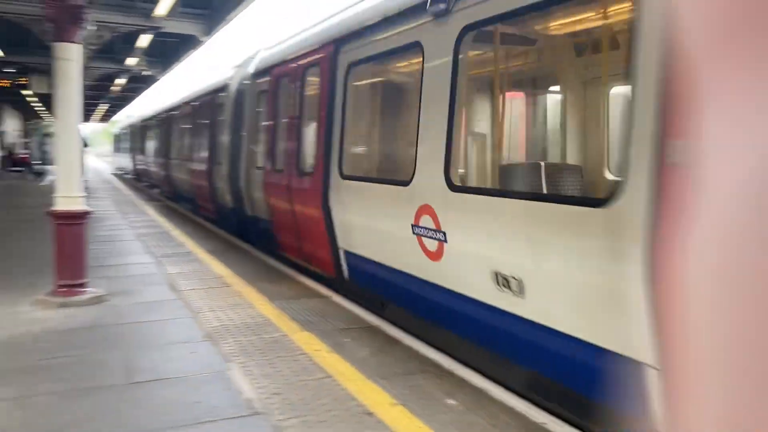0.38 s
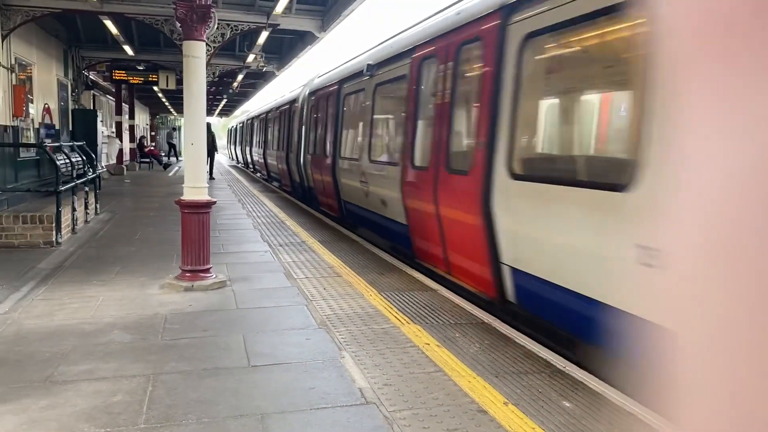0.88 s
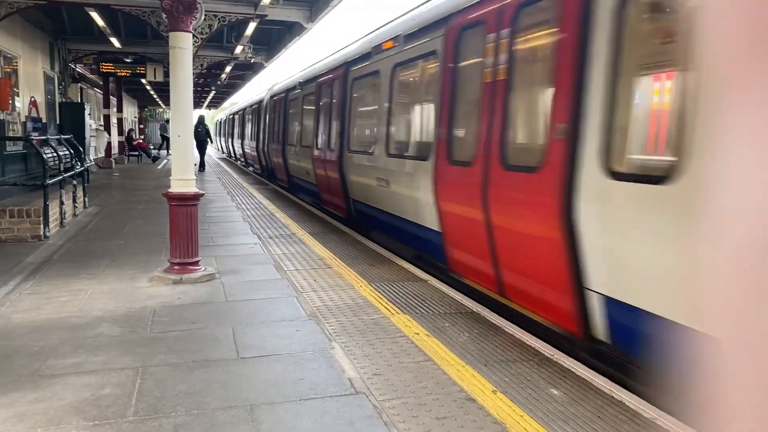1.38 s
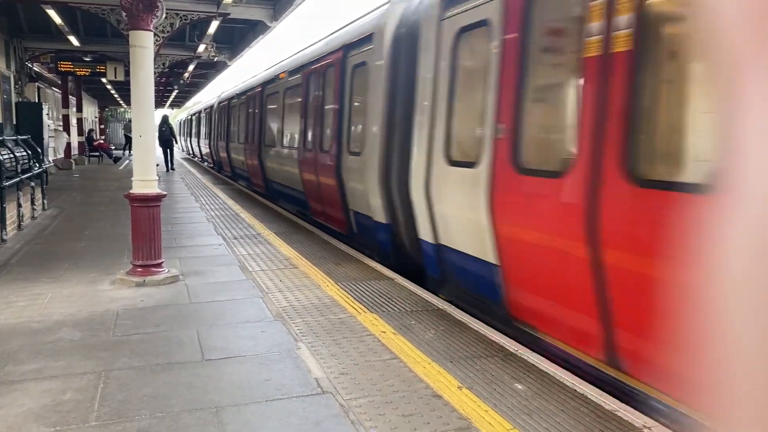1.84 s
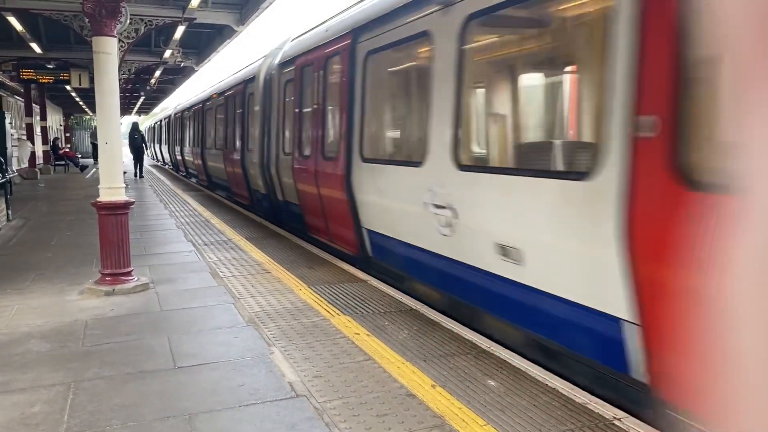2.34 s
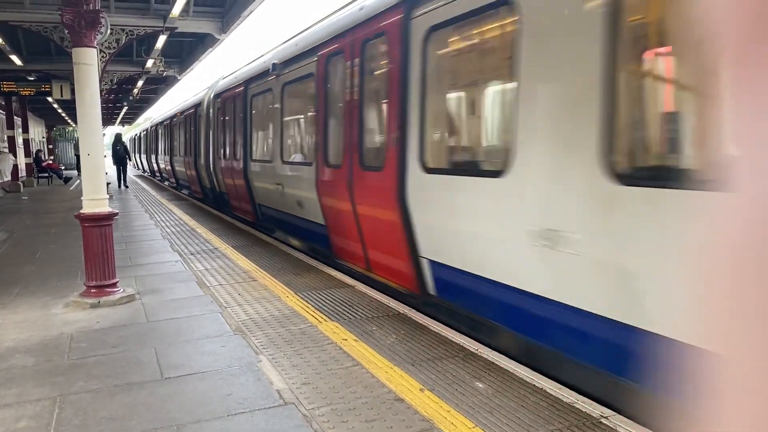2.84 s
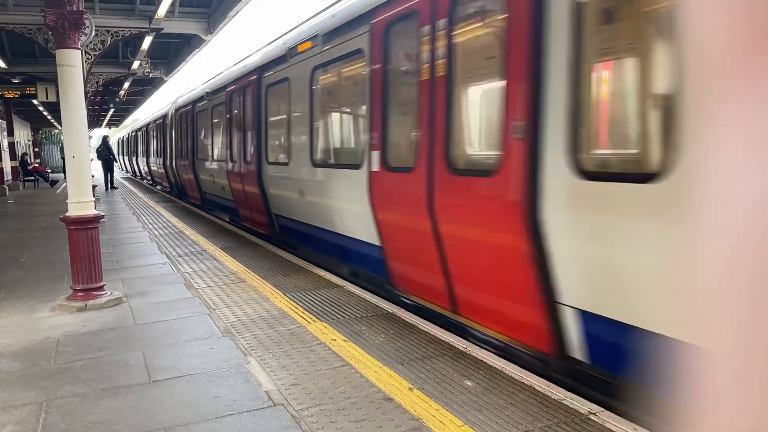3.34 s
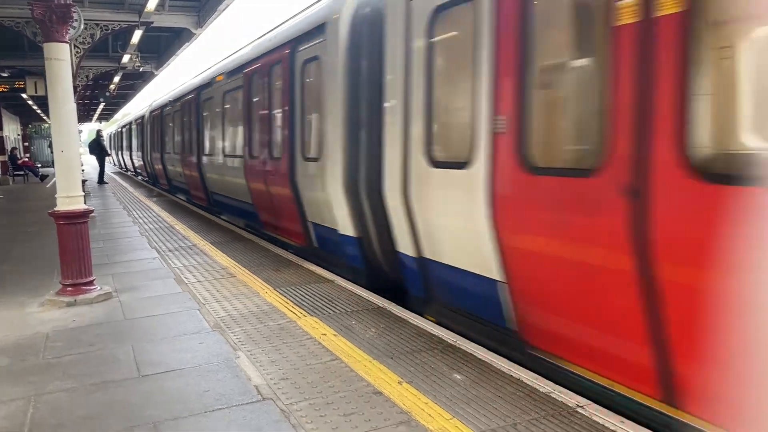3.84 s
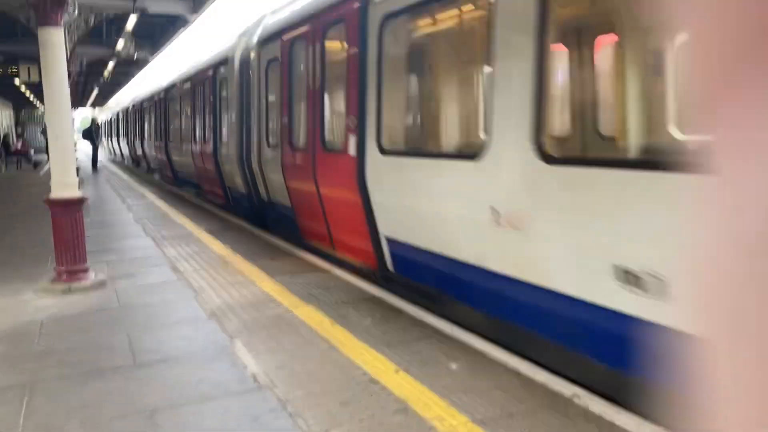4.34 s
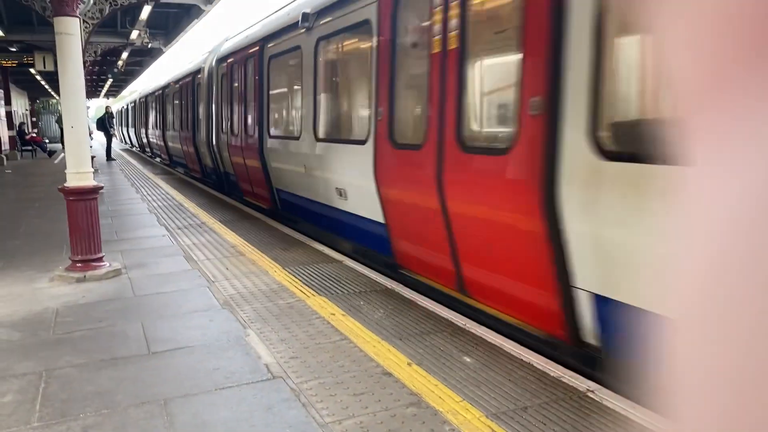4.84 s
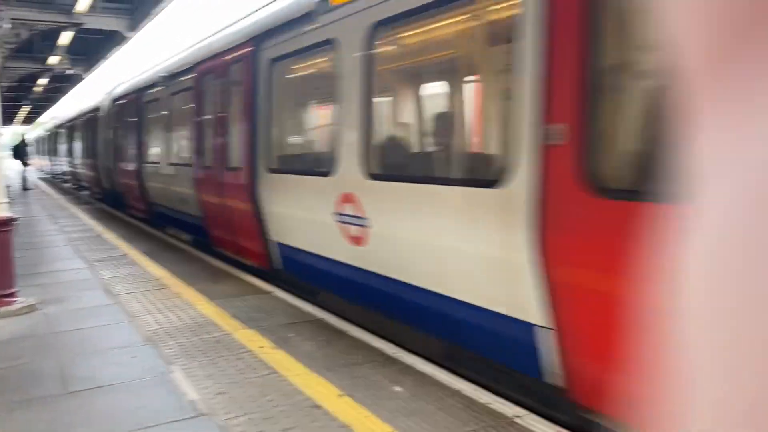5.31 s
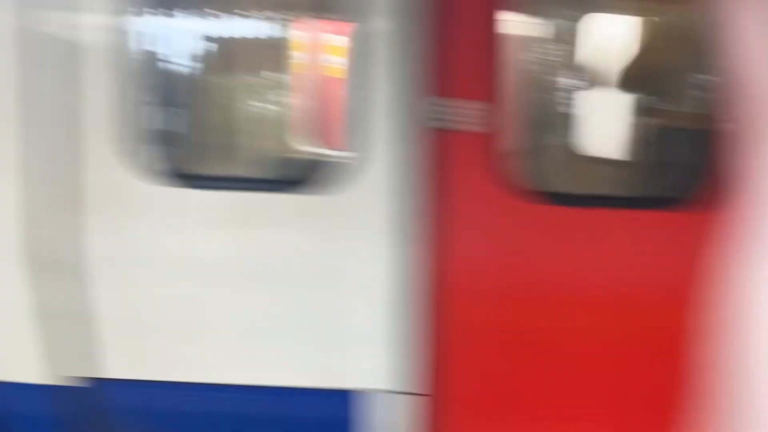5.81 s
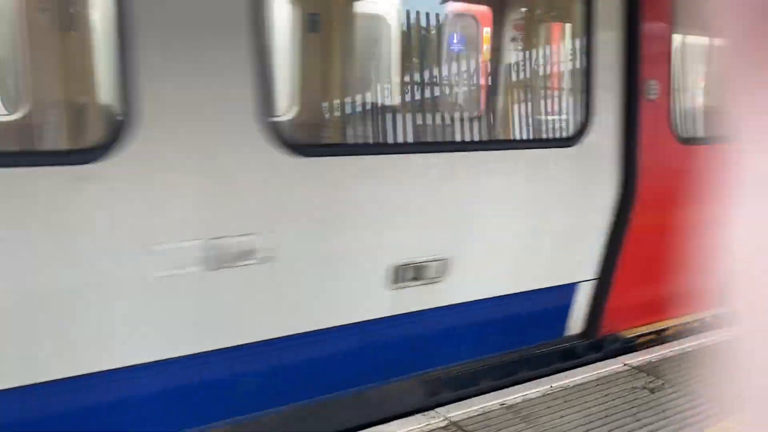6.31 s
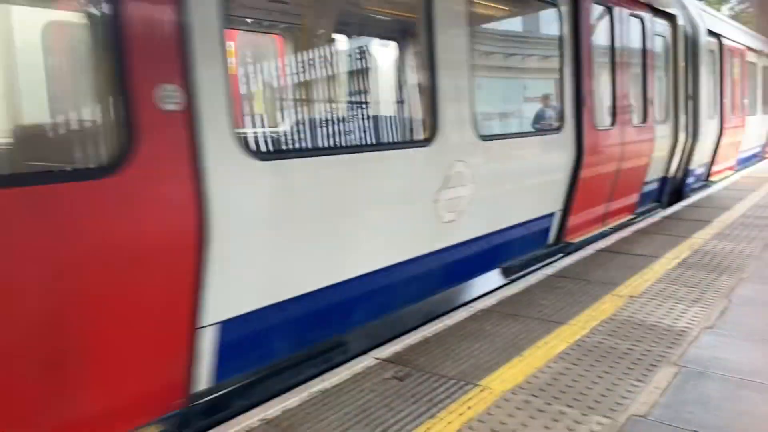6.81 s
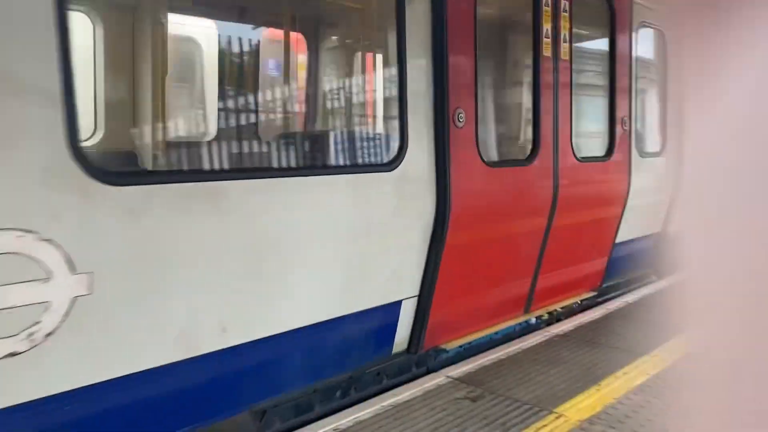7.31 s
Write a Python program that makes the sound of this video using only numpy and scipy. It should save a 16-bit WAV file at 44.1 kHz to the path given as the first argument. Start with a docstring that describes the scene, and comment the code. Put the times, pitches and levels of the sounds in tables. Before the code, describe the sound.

Low wheel rumble and rail roar slowly ease as a train slows close by, its whine sinking while brake scrape and hiss grow.

```python
"""Electric train braking under a station roof

A train slows along a platform, close to a phone with two microphone ports. Filtered noise makes wheel
rumble, roar and ringing rails; wavering sines make gear whine that glides down with the speed.
A broken inverter tone gives way to stronger noisy bands. Loose bogie steel knocks as short decaying modes.
Brake scrape and air hiss grow towards the end, with an air leak and rough squealing bands.
"""
import sys
import numpy as np
from scipy import signal
from scipy.fft import rfft, irfft, next_fast_len
from scipy.io import wavfile
from scipy.ndimage import uniform_filter1d, map_coordinates

SR = 44100
rng = np.random.default_rng(int(sys.argv[2]) if len(sys.argv) > 2 else 0)


def volts_from_db(level):
    """Convert decibel levels to linear amplitude ratios."""
    exponent = np.asarray(level, float) / 20
    return 10 ** exponent


def generate_wav(signal):
    """Clip the signal to [-1, 1] and save it as 16-bit WAV at the path in sys.argv[1]."""
    frames = np.transpose(np.atleast_2d(signal))
    scaled = np.clip(frames, -1, 1) * 32767
    pcm = np.round(scaled).astype(np.int16)
    wavfile.write(sys.argv[1], SR, pcm)


N = 338438  # samples


def clock():
    """Time of every sample in seconds."""
    return np.arange(N) / SR


def unit(x):
    """Scale to rms 1."""
    return x / np.sqrt(np.mean(x ** 2) + 1e-20)


def along(points, hz):
    """Interpolate the value columns of (Hz, value, ..) points on a log frequency axis."""
    point_hz, *columns = np.transpose(points)
    return np.array([np.interp(np.log(hz + 1), np.log(point_hz + 1), column) for column in columns])


def wobble(rate):
    """A smooth random curve, rate knots a second."""
    knots = rng.standard_normal(int(N * rate / SR) + 4)
    return map_coordinates(knots, [np.arange(N) * rate / SR])


def step(at_s, spread_s):
    """A smooth rise from 0 to 1, halfway at at_s."""
    return 1 / (1 + np.exp((at_s - clock()) / spread_s))


def swells(rows, floor_db):
    """Level in dB of bell-shaped swells (s, half length s, peak dB) whose power adds to a floor."""
    power = sum(volts_from_db(2 * db) * np.exp(-((clock() - s) / half_s) ** 2) for s, half_s, db in rows)
    return 10 * np.log10(power + volts_from_db(2 * floor_db))


def filtered(x, response):
    """Multiply the spectrum of x by a response of frequency."""
    size = next_fast_len(N + SR // 2)
    return irfft(rfft(x, size) * response(np.fft.rfftfreq(size, 1 / SR)), size)[..., :N]


def band(f, hz, width_hz):
    """A resonance applied twice; width_hz is that of one pass."""
    return (f * width_hz / (hz * hz - f * f + 1j * f * width_hz)) ** 2


def rush(response, patchy_db):
    """Two unrelated noises of joint rms 1 with shared time-frequency patches of random gain."""
    z = signal.stft(rng.standard_normal((2, N + 512)), nperseg=512)[2]
    patches = uniform_filter1d(rng.standard_normal(z.shape[1:]), size=6, axis=0)
    patches = unit(uniform_filter1d(patches, size=12, axis=1))
    pair = signal.istft(z * volts_from_db(patchy_db * patches), nperseg=512)[1][:, :N]
    return unit(filtered(pair, response))


def coloured(spectrum, patchy_db):
    """Patchy noise shaped by a (Hz, dB) spectrum."""
    return rush(lambda f: volts_from_db(along(spectrum, f)), patchy_db)


def tone(hz, db, waver_hz, flutter_db):
    """A sine whose pitch and level waver, as from several motors beating."""
    phase = 2 * np.pi * np.cumsum(hz + waver_hz * wobble(40)) / SR
    level_db = db + flutter_db * (.4 * wobble(9) + wobble(35))
    return np.sqrt(2) * volts_from_db(level_db) * np.sin(phase)


def strand(hz, width_hz):
    """A narrow noise of rms 1 that follows a moving pitch; width_hz is the rate of its wobbles."""
    phase = 2 * np.pi * np.cumsum(hz + np.zeros(N)) / SR
    return unit(wobble(width_hz) * np.sin(phase) + wobble(width_hz) * np.cos(phase))


MESH_HZ = 565  # gear mesh at the start
SAG_HZ_PER_S, SAG_HZ_PER_S2 = 24.6, .87  # braking bites ever harder


def mesh():
    """Gear mesh pitch in Hz, a measure of the speed."""
    return MESH_HZ - SAG_HZ_PER_S * clock() - SAG_HZ_PER_S2 * clock() ** 2


# Spectrum of the ground thud. Each row: frequency in Hz, relative density in dB per Hz.
THUD_SPECTRUM = [(22, -42), (32, -9), (42, -6.5), (55, 7.5), (66, 5.5), (76, 11), (86, 7), (100, -6),
                 (130, -27), (200, -64)]
# Spectrum of the bogie rumble. Each row: frequency in Hz, relative density in dB per Hz.
RUMBLE_SPECTRUM = [(60, -54), (90, -3), (120, -0.5), (168, -3), (229, -2), (300, -3), (421, -5.5),
                   (531, -12.5), (601, -11.5), (747, -21), (1000, -32.5), (2000, -90)]
# Spectrum of the tread roar. Each row: frequency in Hz, relative density in dB per Hz.
ROAR_SPECTRUM = [(400, -29), (700, 1), (1000, 0), (1600, -3), (1800, -2), (2400, -5.5), (3050, -3.5),
                 (3330, -9), (3600, -6.5), (4600, -9.5), (5500, -18), (7000, -24), (9000, -59)]
# The thud swells as axles pass. Each row: centre in seconds, peak level in dB.
AXLE_PASSES = [(.3, -22.5), (1.05, -28), (1.49, -24.5), (2.41, -23.5), (2.86, -27), (3.18, -21),
               (3.7, -23.5), (4.31, -21.5), (4.62, -26.5), (5.0, -33.5), (5.4, -23.5), (6.09, -24),
               (7.24, -27.5)]
# Ringing of car floor and rail. Each row: centre in Hz, width in Hz, rms level in dB at the starting speed.
RINGING_BANDS = [(232, 40, -29.5), (605, 50, -43)]
THUD_DB, RUMBLE_DB, ROAR_DB = -27, -20.5, -33.5  # at the starting speed
THUD_LAW, RUMBLE_LAW, ROAR_LAW, RING_LAW = 0.4, 0.72, 0.59, 0.59  # dB lost for each dB of speed lost
AXLE_HALF_S, AXLE_RUMBLE_DB = 0.083, -8  # half length of a swell; rumble it brings along, over the thud


def wheels():
    """Rough wheels on rough rail: the ground thuds, bogies rumble, treads roar and floor and rail ring."""
    speed_db = 20 * np.log10(mesh() / MESH_HZ)
    axles = volts_from_db(swells([(s, AXLE_HALF_S, db) for s, db in AXLE_PASSES], floor_db=-80))
    thud_gain = np.hypot(volts_from_db(THUD_DB + THUD_LAW * speed_db), axles)
    thud = thud_gain * coloured(THUD_SPECTRUM, patchy_db=-0.26)
    rumble_gain = np.hypot(volts_from_db(RUMBLE_DB + RUMBLE_LAW * speed_db), volts_from_db(AXLE_RUMBLE_DB) * axles)
    rumble = rumble_gain * volts_from_db(0.45 * wobble(5)) * coloured(RUMBLE_SPECTRUM, patchy_db=0.65)
    roar_gain = volts_from_db(ROAR_DB + ROAR_LAW * speed_db + 0.41 * wobble(7))
    roar = roar_gain * coloured(ROAR_SPECTRUM, patchy_db=1.44)
    rings = 0
    for hz, width_hz, db in RINGING_BANDS:
        ring_gain = volts_from_db(db + RING_LAW * speed_db + 1.3 * wobble(3))
        rings = rings + ring_gain * rush(lambda f: band(f, hz, width_hz), patchy_db=.5)
    return thud + rumble + roar + rings


# Each gear order swells while a motor bogie is near.
# Second order. Each row: centre in seconds, half length in seconds, peak level in dB before the mix.
SECOND_ORDER = [(.3, .4, -46), (1.0, .35, -48), (1.5, .3, -44.5), (2.3, .3, -40.5), (2.85, .35, -44),
                (3.6, .22, -40.5), (4.2, .4, -46), (4.8, .3, -45), (5.35, .35, -45), (6.0, .4, -50)]
# Third order. Each row: centre in seconds, half length in seconds, peak level in dB before the mix.
THIRD_ORDER = [(.4, .3, -52), (1.0, .35, -44), (1.9, .45, -47), (2.6, .3, -50), (3.1, .4, -47),
               (4.6, .4, -51)]
# Sixth order. Each row: centre in seconds, half length in seconds, peak level in dB before the mix.
SIXTH_ORDER = [(.2, .45, -53)]
# Eighth order. Each row: centre in seconds, half length in seconds, peak level in dB before the mix.
EIGHTH_ORDER = [(5.65, .25, -49), (6.3, .3, -52), (6.9, .35, -50)]
THIRD, EIGHTH = 3.02, 8.1  # multiples of the mesh


def gears():
    """Meshing teeth whine at multiples of the mesh pitch, gliding down with the speed."""
    # Each row: multiple of the mesh, swells, pitch waver in Hz, level flutter in dB.
    orders = [(2, SECOND_ORDER, 14, 2), (THIRD, THIRD_ORDER, 22, 2.4),
              (2 * THIRD, SIXTH_ORDER, 40, 3), (EIGHTH, EIGHTH_ORDER, 30, 2.5)]
    return sum(tone(multiple * mesh(), swells(rows, floor_db=-68), waver_hz, flutter_db)
               for multiple, rows, waver_hz, flutter_db in orders)


# The tone comes in chirps. Each row: centre in seconds, half length in seconds, peak level in dB before the mix.
INVERTER_CHIRPS = [(.04, .012, -36), (.064, .008, -40), (.15, .03, -43), (.215, .03, -39), (.288, .02, -34),
                   (.345, .04, -37), (.41, .02, -43), (.47, .025, -42), (.52, .025, -36), (.59, .025, -40),
                   (.67, .02, -36), (.752, .008, -33), (.82, .03, -44)]
# Smeared partials. Each row: multiple of the tone, relative level in dB, smear width in Hz.
SMEARED_PARTIALS = [(1, 0, 130), (1.57, -6.5, 150), (2.02, -6, 150), (2.47, -7, 150), (2.97, -5.5, 170)]
INVERTER_HZ, INVERTER_SAG_HZ_PER_S = 1440, 45


def inverter_tone():
    """A rough sagging tone broken into chirps over the first second, with smeared overtones."""
    hz = INVERTER_HZ - INVERTER_SAG_HZ_PER_S * clock()
    chirp_db = swells(INVERTER_CHIRPS, floor_db=-90)
    out = tone(hz, chirp_db, waver_hz=20, flutter_db=1.3)
    steady = volts_from_db(swells([(.4, .45, -43)], floor_db=-90))  # the overtones break up less
    for multiple, db, width_hz in SMEARED_PARTIALS:
        gain = np.hypot(volts_from_db(chirp_db), steady * (1 if multiple > 1 else .5))
        out = out + volts_from_db(db - 3) * gain * strand(multiple * hz, width_hz)
    return out


NEAR_S, NEAR_SPREAD_S = 6.46, 0.42  # the phone turns to face the brake gear
# Two band groups, lower then upper. Each row: base level in dB before the switch,
# base level in dB after it, growth in dB with nearness.
CARRIER_LEVELS = [(-46.5, -38.5, -3), (-52, -43.5, 1.5)]
# A list of bands for each group. Each row: centre in Hz, width in Hz, relative level in dB, growth in dB per s.
CARRIER_PARTS = [
    [(2162, 270, -1.5, 0), (2410, 500, -2, -1.5)],
    [(3810, 480, 0.5, 0.5), (4130, 800, 0, 1), (4540, 640, -5.5, -1)],
]
# Thin lines drifting inside the lower group. Each row: centre in Hz, width in Hz, relative level in dB.
DRIFTING_LINES = [(2200, 50, -13), (2450, 60, -15)]
# The lowest band wanders. Each row: time in seconds, pitch in Hz.
LOWEST_PITCH = [(.9, 1960), (1.3, 1950), (1.6, 2000), (2.0, 1940), (2.75, 1915), (3.15, 2010), (3.8, 1915),
                (4.3, 1980), (4.95, 2060), (5.4, 2040), (5.7, 1945), (6.0, 2000), (6.8, 1960), (7.67, 1960)]
# Its broad part and ringing strand. Each row: width in Hz, relative level in dB, growth in dB per s,
# share of the wander from 0 to 1.
LOWEST_PARTS = [(300, -4.5, .3, .5), (50, -10, .1, 1)]
# The lowest band sings out. Each row: centre in seconds, half length in seconds, peak in dB over its level.
LOWEST_SWELLS = [(1.4, .2, 3), (2.75, .12, -1), (3.15, .12, -1), (3.8, .12, -2), (4.95, .1, 0),
                 (5.75, .12, 1), (6.0, .1, 0), (7.6, .1, 1)]
SWITCH_S, SWITCH_SPREAD_S = 0.84, 0.038  # the inverter changes its pattern
CARRIER_HZ = 1975


def inverter_noise():
    """Randomised switching: noisy bands near the carrier and its double; the lowest wanders and rings."""
    switched, near = step(SWITCH_S, SWITCH_SPREAD_S), step(NEAR_S, NEAR_SPREAD_S)
    late_s = clock() - N / SR / 2  # time from the middle
    levels = [before + (after - before) * switched + growth * near
              for before, after, growth in CARRIER_LEVELS]
    bands = 0
    for level_db, parts in zip(levels, CARRIER_PARTS):
        for hz, width_hz, part_db, growth_db in parts:
            gain = volts_from_db(level_db + part_db - 3.5 + growth_db * late_s + 1.0 * wobble(8))
            bands = bands + gain * rush(lambda f: band(f, hz, width_hz), patchy_db=1.5)
    drifting = sum(volts_from_db(db + 3.5 * wobble(3)) * strand(hz + 60 * wobble(1.5), width_hz)
                   for hz, width_hz, db in DRIFTING_LINES)
    wander_hz = np.interp(clock(), *np.transpose(LOWEST_PITCH)) - CARRIER_HZ
    lowest = 0
    for width_hz, part_db, growth_db, share in LOWEST_PARTS:
        gain = volts_from_db(part_db + growth_db * late_s + 1.5 * wobble(7))
        pair = np.array([strand(CARRIER_HZ + share * wander_hz, width_hz) for _ in range(2)])
        lowest = lowest + gain * pair
    lowest_gain = volts_from_db(levels[0] + swells(LOWEST_SWELLS, floor_db=0))
    return lowest_gain * lowest + volts_from_db(levels[0]) * drifting + bands


# Spectrum of the pad scrape. Each row: frequency in Hz, relative density in dB per Hz.
SCRAPE_SPECTRUM = [(2500, -8.5), (4500, -3), (5500, -1.5), (7000, -3), (8500, -8.5), (10000, -8.5),
                   (11000, -16), (13000, -60)]
# Spectrum of the air hiss. Each row: frequency in Hz, relative density in dB per Hz.
HISS_SPECTRUM = [(7000, -20), (8500, -13), (9500, -13), (11000, 1.5), (12500, 1.5), (13500, -1),
                 (14500, -5), (15300, -14), (15800, -30), (16200, -60)]
# Braked bogies pass. Each row: centre in seconds, half length in seconds, scrape peak level in dB.
BRAKED_BOGIES = [(1.38, 0.13, -45.5), (2.9, 0.1, -48), (3.9, 0.14, -47), (5.98, 0.14, -47), (6.3, .05, -43)]
# An air leak passes close. One row: centre in seconds, half length in seconds, peak level in dB.
AIR_LEAK = (6.97, 0.33, -49)
SCRAPE_DB, SCRAPE_NEAR_DB, HISS_DB, HISS_NEAR_DB = -48.5, 9.5, -63.5, 8  # far level, growth with nearness
BOGIE_HISS_DB = -18  # air of a passing bogie, over its scrape
LEAK_HZ, LEAK_SAG_HZ_PER_S, LEAK_WHISTLE_DB = 12200, 13000, -5  # pitch at its centre, fall, level over its hiss


def brakes():
    """Pads scrape and air hisses, swelling as bogies pass and flickering together; a leak whistles downwards."""
    near, flicker = step(NEAR_S, NEAR_SPREAD_S), wobble(6)
    bogies = volts_from_db(swells(BRAKED_BOGIES, floor_db=-90))
    leak_db = swells([AIR_LEAK], floor_db=-110)
    scrape_gain = np.hypot(volts_from_db(SCRAPE_DB + SCRAPE_NEAR_DB * near), bogies)
    scrape = scrape_gain * volts_from_db(.95 * flicker) * coloured(SCRAPE_SPECTRUM, patchy_db=1.55)
    air_gain = np.hypot(volts_from_db(HISS_DB + HISS_NEAR_DB * near), volts_from_db(BOGIE_HISS_DB) * bogies)
    hiss_gain = np.hypot(air_gain, volts_from_db(leak_db))
    hiss = hiss_gain * volts_from_db(0.7 * flicker) * coloured(HISS_SPECTRUM, patchy_db=1.8)
    whistle_hz = np.clip(LEAK_HZ - LEAK_SAG_HZ_PER_S * (clock() - AIR_LEAK[0]), 8500, 14200)
    # low-passed noise on a falling sine makes the whistle rough
    rough = rush(np.ones_like, patchy_db=1)
    rough = unit(filtered(rough, lambda f: 1 / (1 + 1j * f / 700) ** 2))
    whistle = rough * np.sqrt(2) * np.sin(2 * np.pi * np.cumsum(whistle_hz) / SR)
    return scrape + hiss + volts_from_db(leak_db + LEAK_WHISTLE_DB) * whistle


# Decay of the canopy. Each row: frequency in Hz, time to fall 60 dB in seconds.
ROOF_DECAY = [(300, 0.96), (2000, 1), (10000, 0.031)]


def roof(x):
    """The canopy answers with two unrelated noise tails, each frequency dying at its own speed."""
    hz, t, z = signal.stft(rng.standard_normal((2, SR)), SR, nperseg=256)
    tail = signal.istft(z * volts_from_db(-60 * t / along(ROOF_DECAY, hz).T), SR, nperseg=256)[1]
    return signal.fftconvolve(x[None], tail / np.linalg.norm(tail[0]), axes=1)[:, :N]


# Distinct knocks. Each row: start in seconds, relative level in dB, upper modes over lower in dB.
KNOCKS = [(1.106, -31, 3), (1.27, -21, 2), (1.335, -17.5, 0), (1.352, -28, 6), (1.377, -25, -7),
          (1.402, -23, -9), (1.4316, -27, -9), (1.452, -25, -6), (1.572, -27, -6), (1.6194, -30, 0),
          (1.866, -25, 9), (2.041, -31, -3), (2.8885, -33, 0), (3.8494, -33, 0)]
# Modes of the steel. Each row: nominal pitch in Hz, relative level in dB, time to fall 60 dB in seconds.
STEEL_MODES = [(2560, 5, .036), (2720, -1, .03), (3080, 5.5, .036), (3200, -3, .025), (3900, -8, .02)]
SPLIT_HZ = 2850  # modes above it are the upper ones
RATTLE_FROM_S, RATTLE_TO_S, RATTLE_DB, RATTLE_COUNT = 1.05, 2.1, -33, 30  # small random knocks


def clanks():
    """Loose bogie steel knocks: each blow favours its lower or upper modes, with a little puff of noise."""
    out, t = np.zeros(N + SR), np.arange(SR // 4) / SR
    rattle = rng.uniform([RATTLE_FROM_S, RATTLE_DB - 4, -9], [RATTLE_TO_S, RATTLE_DB + 2, 9],
                         size=(RATTLE_COUNT, 3))
    for s, db, upper_db in [*KNOCKS, *rattle]:
        ring = 0
        for hz, level_db, t60 in STEEL_MODES:
            favour_db = min(0, np.sign(hz - SPLIT_HZ) * upper_db)  # only the weaker side is turned down
            decay = volts_from_db(level_db + favour_db + rng.normal(0, 1.5) - 60 * t / t60)
            ring = ring + decay * np.sin(2 * np.pi * hz * rng.normal(1, .012) * t)
        puff = .8 * volts_from_db(-60 * t / .016) * rng.standard_normal(len(t))
        attack = 1 - np.exp(-t / .0007)
        out[round(s * SR):][:len(t)] += volts_from_db(db - 2) * (ring + puff) * attack
    return filtered(out[:N], lambda f: 1 / (1 + 1j * f / 3500))


# Rough bands as the pads bite. Each row: centre in Hz, width in Hz, relative level in dB.
SQUEAL_BANDS = [(4180, 260, -50), (5350, 500, -52), (8500, 800, -55), (13100, 1400, -58)]
SQUEAL_S, SQUEAL_SPREAD_S = 7.08, .07


def squeal():
    """Late on the pads bite and sing in rough bands of resonant noise."""
    def bands(f):
        return sum(volts_from_db(db) * band(f, hz, width_hz) / np.sqrt(width_hz) for hz, width_hz, db in SQUEAL_BANDS)

    total = np.linalg.norm([volts_from_db(db) for _, _, db in SQUEAL_BANDS])
    return total * step(SQUEAL_S, SQUEAL_SPREAD_S) * rush(bands, patchy_db=0.0)


def scene():
    """Row 0 is the sound field, row 1 its twin from other directions, sharing only the close sounds."""
    tones, knocks = gears() + inverter_tone(), clanks()
    close = (.9 * tones + knocks) * [[1], [.4]]
    reflections = roof(volts_from_db(-14) * tones + volts_from_db(-18) * knocks)
    return wheels() + brakes() + squeal() + inverter_noise() + close + reflections


# The pair of ports. Each row: frequency in Hz, likeness from 0 to 1, left-right balance in dB.
PORT_LIKENESS = [(60.5, 1, 0), (161, 0.95, 2.5), (322, 0.9, 3.5), (444, 0.69, 3.5), (765, 0.48, -0.5),
                 (1410, 0.29, 0), (1750, 0.03, 1.5), (3230, 0.14, -2), (5500, 0.43, -5.5),
                 (6100, 0.47, -5.5), (6840, 0.14, 1), (8600, 1, -1), (11000, 0.73, 0.5),
                 (14100, 0.95, -0.5)]
# Phase between the ports. Each row: frequency in Hz, left lead in radians.
PORT_LEAD = [(300, 0), (450, -.4), (780, -1.6), (1380, -.3), (1800, 1.9), (3200, -.8), (5300, -.5),
             (6700, 0), (8450, 2.75), (10150, 3.55), (11150, 5.9), (13200, 6.7), (14300, 9.3)]


def ports(hz):
    """Gains from the first and the second field row to the left and right port."""
    alike, pan_db = along(PORT_LIKENESS, hz)
    turn = np.arccos(np.clip(alike, 0, 1)) / 2  # a wider angle makes the ports less alike
    side = np.array([[1], [-1]])
    port = volts_from_db(side * pan_db / 2) * np.exp(side * .5j * along(PORT_LEAD, hz))
    return port * np.cos(turn), port * np.sin(turn) * side


def top_cut(x):
    """Nothing passes above the cut-off."""
    return signal.sosfilt(signal.butter(12, 14860, fs=SR, output="sos"), x)


def record(dry):
    """Two ports hear the field with their own lead and balance; the loudest peaks are rounded."""
    pair = filtered(dry[0], lambda f: ports(f)[0]) + filtered(dry[1], lambda f: ports(f)[1])
    rounded = pair / (1 + np.abs(pair / .68) ** 5) ** (1 / 5)
    return top_cut(rounded)


dry = scene()
out = record(dry)
generate_wav(out)
```